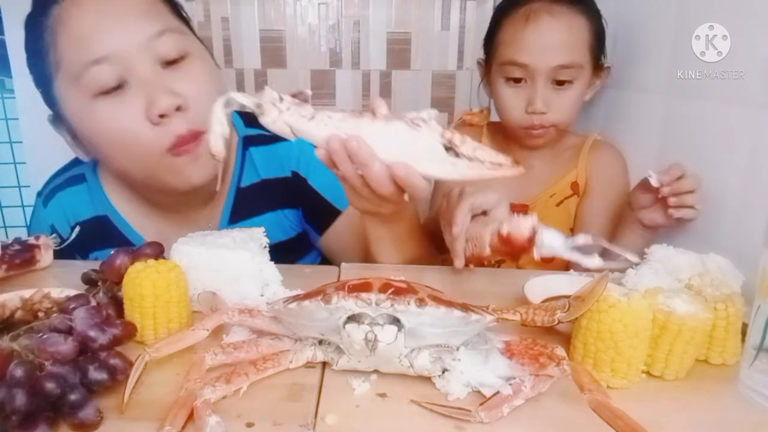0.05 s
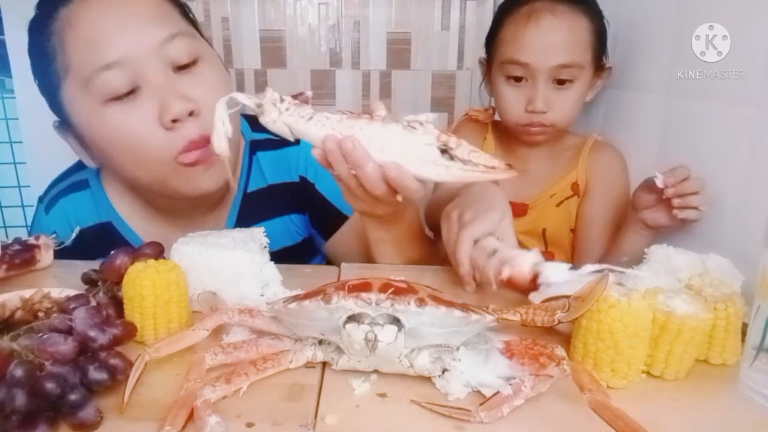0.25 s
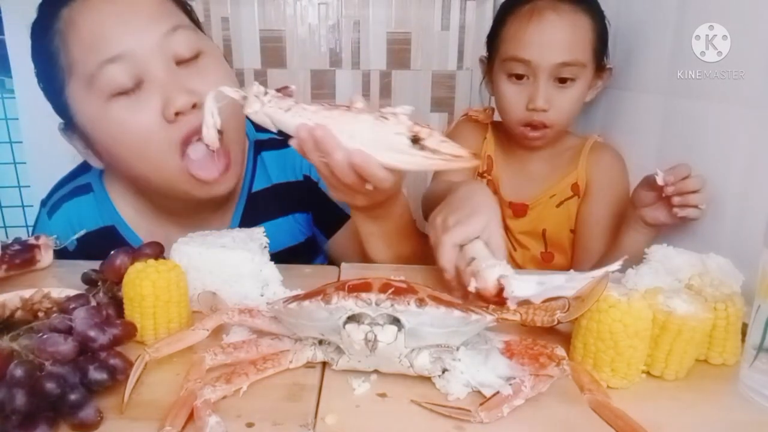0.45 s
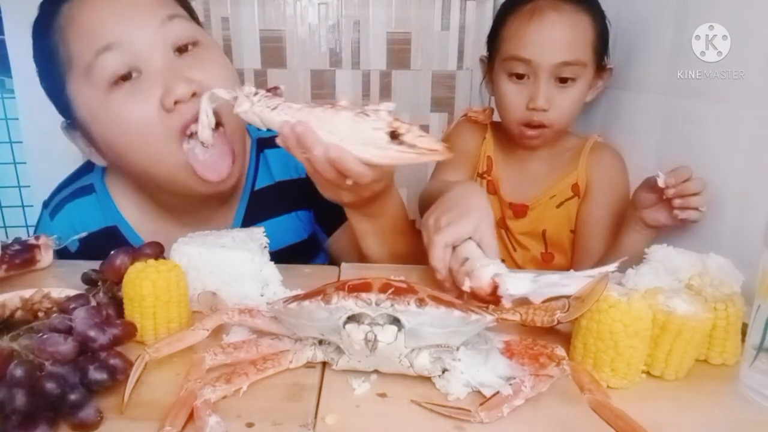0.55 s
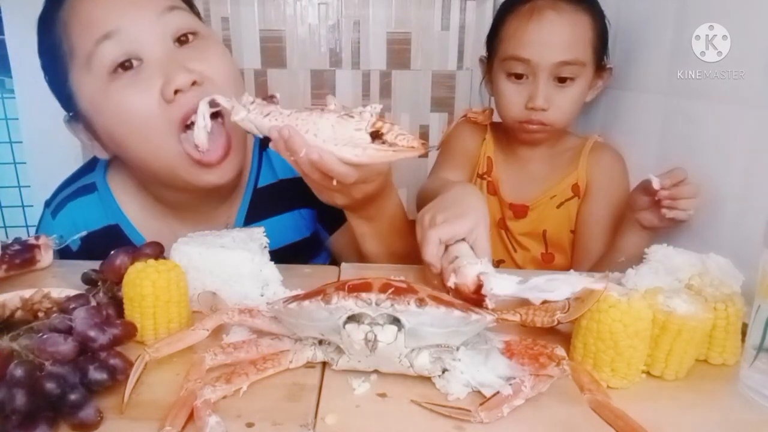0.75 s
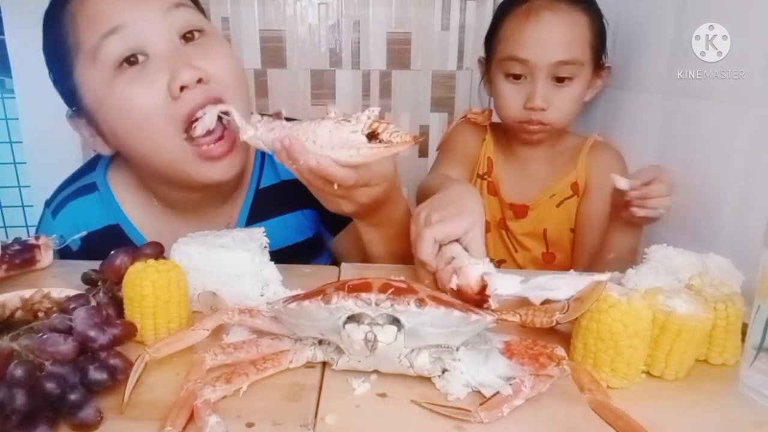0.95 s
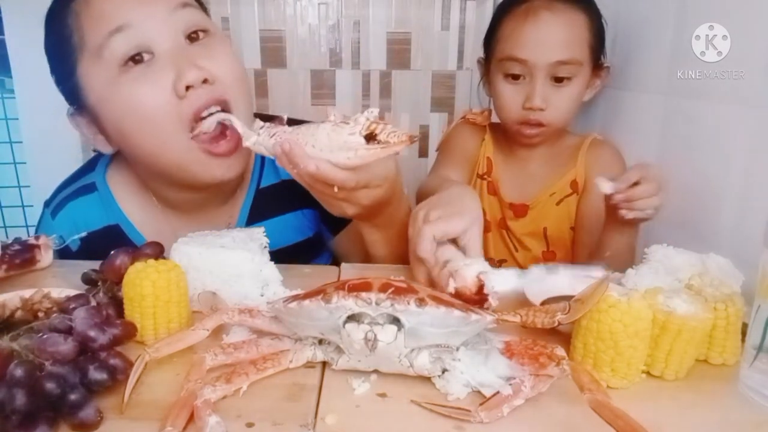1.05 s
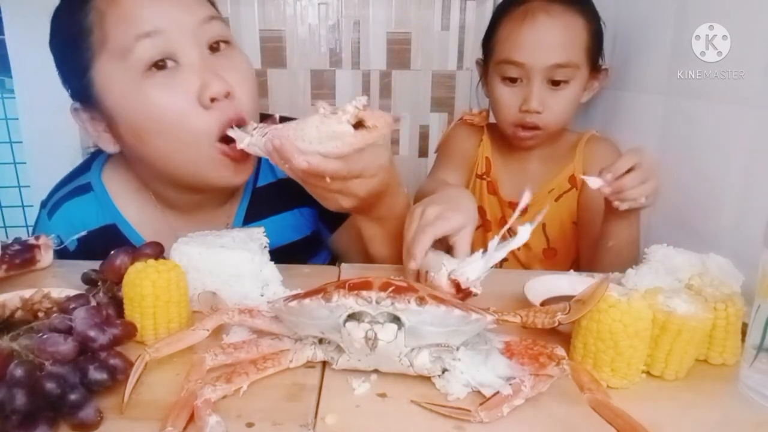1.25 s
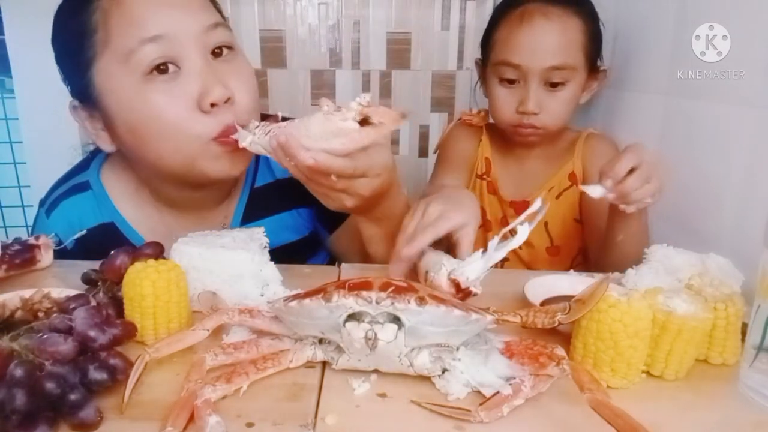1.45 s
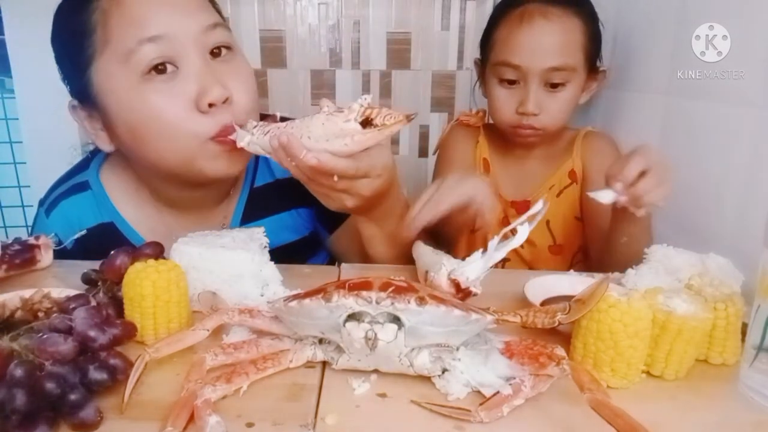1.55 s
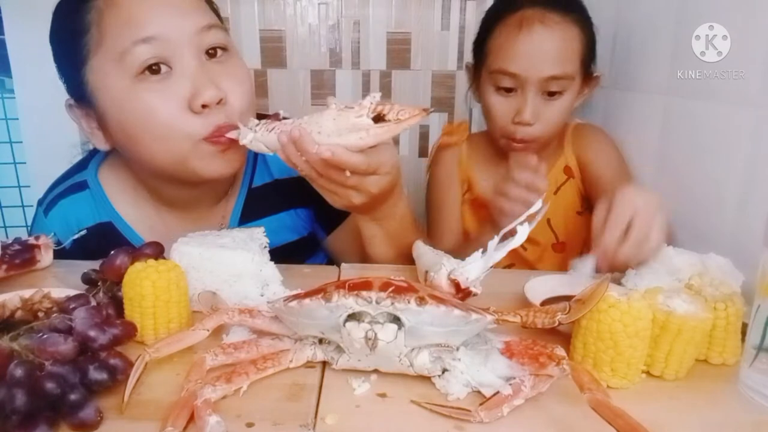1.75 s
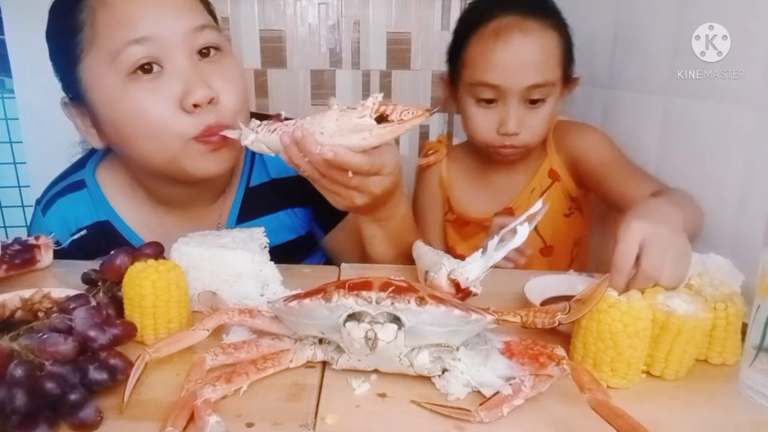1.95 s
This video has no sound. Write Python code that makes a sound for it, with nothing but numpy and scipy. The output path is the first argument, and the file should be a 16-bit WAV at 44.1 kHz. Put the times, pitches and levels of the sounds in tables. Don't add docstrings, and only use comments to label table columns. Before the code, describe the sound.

One loud clack of shell on wood comes early, then tiny crackles, a cluster of duller taps and thuds around the middle, and faint scraping; close phone pickup, short room echo, quiet insect rasp and low rumble behind.

```python
import sys
import numpy as np
from scipy import signal
from scipy.fft import rfft, irfft, next_fast_len
from scipy.io import wavfile
from scipy.ndimage import uniform_filter1d, map_coordinates

SR = 44100
rng = np.random.default_rng(int(sys.argv[2]) if len(sys.argv) > 2 else 0)


def undo_db(level):
    steps = np.asarray(level, float) / 20
    return 10 ** steps


def unload_wav(signal):
    wavfile.write(
        sys.argv[1],
        SR,
        np.round(np.clip(np.atleast_2d(signal).T, -1, 1) * 32767).astype(np.int16),
    )


N = 88200
T = np.arange(SR // 2) / SR

# start in seconds, peak level in dB.
KNOCKS = [
    (.2305, -9),
    (.2345, -16),
    (.2395, -20),
]
TABLE_HZ = [275, 468, 545, 715, 915, 980, 1115, 1281, 1670, 1733, 2070, 2900]
# level in dB, time to fall 60 dB in seconds.
TABLE_RING = [(-14, 0.19), (-7.5, 0.077), (-6, 0.075), (4.5, 0.077), (4, 0.18), (5.5, 0.064), (5, 0.09),
              (-6, 0.045), (11.5, 0.05), (-10, 0.086), (-4, 0.013), (3, 0.043)]
DISH_HZ = [2388, 2375, 4897, 4906, 7515, 7998, 11826]
# level in dB, time to fall 60 dB in seconds.
DISH_RING = [(-14.5, .21), (-15, .23), (-32, .22), (-42, .34), (-36, .1), (-29, .09), (-42, .13)]
DISH_BEAT_S = [.021, .021, .105, .105, 0, 0, 0]
# frequency in Hz, level in dB per Hz.
SPLASH_COLOUR = [(59, -54.5), (100, -25.5), (942, -15), (1430, -8), (1700, -16), (4640, -27), (4940, -23.5),
                 (8170, -42.5), (15000, -77.5)]
# frequency in Hz, time to fall 60 dB in seconds.
SPLASH_FADE = [(150, 0.32), (700, 0.19), (1600, 0.19), (3000, 0.26), (5000, 0.1), (9000, 0.11), (15000, .1)]

THUD_S = [.222, .665, .69, .77, 1.063, 1.078, 1.197, 1.216, 1.24, 1.2245, 1.253, 1.0675]
# peak level in dB, time to fall 60 dB in seconds, corner above which it is dull in Hz.
THUDS = [(-42.5, .05, 850), (-49, 0.19, 290), (-40, 0.071, 186), (-56.5, 0.16, 430), (-23.5, 0.067, 1700),
         (-15.5, 0.014, 5000), (-36, 0.048, 770), (-31.5, 0.097, 260), (-39.5, 0.083, 330), (-56, .06, 160),
         (-35, 0.046, 120), (-24.5, 0.01, 1800)]
# frequency in Hz, level in dB.
THUD_NOTES = [(85, -8.5), (228, 6.5), (330, -6.5), (565, -4), (713, -3.5), (915, -6), (1350, -12.5)]

TICK_S = [.2015, .4277, .477, .6888, .689, .6893, .6896, .922, .9874, 1.0054, 1.006, 1.015, 1.094, 1.3115,
          1.312, 1.3142, .9878, .989, 1.006, 1.012, 1.014, 1.023, 1.1185, .4821, .482, .474, .4905, .498,
          .474, .435, 1.016, 1.3125, 1.316, .2305, .2305, .2345, .231, .692, 1.124, 1.2158, 1.1965, 1.0645,
          1.079, 1.0058, .9878]
TICK_HZ = [4300, 3700, 2850, 1300, 13000, 8600, 4400, 2800, 4700, 5400, 11500, 5500, 3800, 6600, 4200, 6500,
           5430, 3080, 3870, 3080, 4550, 5600, 2850, 2850, 1150, 5300, 3700, 1550, 3700, 3300, 7300, 7100,
           4000, 3000, 4300, 5500, 14500, 1650, 3700, 236, 240, 715, 600, 9000, 12500]
# peak level in dB, time to fall 60 dB in seconds.
TICKS = [(-61.5, .02), (-49.5, 0.033), (-51, 0.03), (-55.5, 0.081), (-53.5, 0.0069), (-39, 0.015),
         (-34.5, 0.013), (-68.5, 0.11), (-51, 0.017), (-43, 0.049), (-44, 0.0082), (-44, 0.023),
         (-52, 0.054), (-41, 0.016), (-56.5, 0.063), (-37, 0.083), (-54, 0.053), (-65, .03), (-55.5, 0.078),
         (-60, 0.05), (-66, 0.023), (-45, 0.017), (-59.5, 0.12), (-52, 0.042), (-47.5, 0.0091),
         (-54, 0.035), (-54, 0.022), (-52.5, 0.014), (-60, 0.015), (-50.5, 0.014), (-46.5, .02),
         (-37.5, 0.044), (-63, 0.044), (-22, 0.015), (-30.5, .01), (-29, .012), (-50.5, .01), (-62, 0.062),
         (-54, 0.024), (-45, 0.099), (-49.5, 0.07), (-44, 0.081), (-40, 0.03), (-50, .005), (-56, .005)]

RUB_S = [.40, .465, .652, .688, .69, .90, .972, .985, 1.0, 1.055, 1.09, 1.095, 1.19, 1.2, 1.24, 1.3, 1.44,
         1.47, 1.53, 1.55, 1.75, 1.93, 1.063, .68, 1.42, 0, 0, 1.3, 1.325, 1.79, 1.213, 1.313, .41, .475,
         .39]
RUB_HZ = [3300, 1700, 3200, 13500, 4500, 1250, 13000, 4500, 3300, 15000, 3300, 1200, 700, 1450, 14500, 1450,
          620, 1400, 3300, 1450, 1630, 610, 750, 450, 950, 830, 300, 810, 1330, 68, 245, 4000, 200, 2500,
          1500]
# length in seconds,
# level in dB, width in Hz.
RUBS = [(0.047, -63, 3200), (0.021, -51.5, 1700), (0.073, -63.5, 820), (0.035, -67.5, 5000),
        (0.063, -89, 4200), (0.36, -68, 270), (0.11, -78, 3800), (0.027, -62.5, 920), (0.066, -62.5, 3500),
        (0.032, -74, 1500), (0.072, -61.5, 1200), (0.064, -55.5, 420), (0.096, -64, 380), (0.098, -66, 28),
        (0.044, -77.5, 4300), (0.1, -67, 260), (0.2, -72, 130), (0.19, -65, 190), (0.038, -70.5, 34),
        (0.13, -64, 250), (0.047, -62.5, 23), (0.049, -64, 17), (.04, -45.5, 245), (0.12, -70, 130),
        (0.25, -78, 357), (0.041, -74.5, 150), (0.062, -71, 250), (.07, -73, 65), (0.02, -58.5, 39),
        (.22, -60, 32.8), (0.052, -55, 64), (0.028, -63, 440), (.2, -68.5, 93), (0.039, -64.5, 620),
        (.09, -63, 670)]

# frequency in Hz, time to fall 60 dB in seconds.
ROOM_FADE = [(200, 0.14), (1500, 0.31), (5000, 0.18), (12000, 0.13)]

# centre in Hz, width in Hz, level in dB, chirps per second, chirp depth in dB.
CHORUSES = [
    (5270, 380, -73, 3, 0),
    (5340, 80, -72.5, 8.1, 5),
    (6904, 150, -66, 10.5, 4.5),
    (7110, 520, -67.5, 4.7, 5),
    (9960, 730, -62.5, 9, 0),
]
# time in seconds, level in dB.
LOW_CHORUS_NEARNESS = [(0, -9), (.2, -4), (.4, 4.5), (.5, -5), (.56, -12), (.72, 7), (.82, -9.5), (.88, -1),
                       (1.2, 3), (1.4, 4.5), (1.46, -11), (1.56, 4), (1.72, -4.5), (1.85, -3.5), (2, 1.5)]
# time in seconds, pitch in Hz.
LEAD_SINGER = [(0.0, 5520), (0.22, 4960), (0.37, 5480), (0.49, 5150), (0.67, 5650), (0.81, 5243),
               (0.85, 5460), (1.02, 5490), (1.14, 5200), (1.2, 5543), (1.6, 5283), (1.67, 5590),
               (1.75, 5250), (2.0, 5490)]

# frequency in Hz, level in dB per Hz.
HISS_COLOUR = [(40, -38.5), (200, -1.5), (1600, -10.5), (4400, -18), (6200, -8.5), (8600, 1.5),
               (10900, -11.5), (11500, -29)]
# frequency in Hz, level in dB per Hz.
RUMBLE_COLOUR = [(20, -42.5), (45, -14), (70, -3.5), (114, -7.5), (211, -17), (400, -36), (1100, -120)]
# time in seconds, level in dB.
RUMBLE_LEVEL = [(0.0, -88), (0.26, -57.5), (0.49, -83), (0.73, -67), (0.99, -63.5), (1.09, -56.5),
                (1.15, -53), (1.25, -72), (1.32, -62.5), (1.98, -68.5), (2.0, -67)]
# time in seconds, pitch in Hz, level in dB.
HUM = [(0.4, 115.4, -79), (1.054, 117.7, -55.5), (1.064, 115.8, -45), (1.312, 115.3, -61.5),
       (1.526, 116.2, -54), (1.732, 114.9, -81), (1.794, 109.8, -68.5), (2.0, 114.7, -62)]


def unit(x):
    return x / np.sqrt(np.mean(x ** 2) + 1e-20)


def along(points, hz):
    point_hz, values = np.transpose(points)
    return np.interp(np.log(hz + 1), np.log(point_hz + 1), values)


def curves(rows):
    seconds, *columns = np.transpose(rows)
    return [np.interp(np.arange(N) / SR, seconds, column) for column in columns]


def wobble(rate):
    return map_coordinates(rng.standard_normal(200), [np.arange(N) * rate / SR])


def filtered(x, response):
    size = next_fast_len(len(x) + SR // 2)
    spectrum = rfft(x, size) * response(np.fft.rfftfreq(size, 1 / SR))
    return irfft(spectrum, size)[:len(x)]


def resonance(hz, width_hz):
    return lambda f: (1j * f * width_hz / (hz * hz - f * f + 1j * f * width_hz)) ** 2


def band(hz, width_hz):
    return lambda f: np.exp(-np.abs((f - hz) / width_hz) ** 3)


def dying_noise(fade, colour=((1, 0),)):
    hz, t, z = signal.stft(rng.standard_normal(SR // 2), SR, nperseg=256)
    level_db = along(colour, hz)[:, None] - 60 * t / along(fade, hz)[:, None]
    tail = signal.istft(z * undo_db(level_db), SR, nperseg=256)[1]
    return tail / np.linalg.norm(tail)


def add(out, s, x):
    i = round(s * SR)
    out[i:i + len(x)] += x[:len(out) - i]


def in_room(x, wet_db):
    echoes = signal.fftconvolve(np.pad(x, (130, 0)), dying_noise(ROOM_FADE))
    return np.pad(x, (0, SR // 2)) + undo_db(wet_db) * echoes[:len(x) + SR // 2]


def table_knocks():
    out = np.zeros(N)
    for s, db in KNOCKS:
        wood = np.zeros(len(T))
        for hz, (note_db, t60) in zip(TABLE_HZ, TABLE_RING):
            wood += undo_db(note_db + rng.normal(0, 2.5) - 60 * T / t60) * np.sin(2 * np.pi * hz * T)
        wood *= 1 - np.exp(-T / 0.00055)
        add(out, s, undo_db(db - 14.5) * in_room(wood, -11))
    return out


def dish():
    out, ring = np.zeros(N), np.zeros(len(T))
    for k, (hz, beat_s, (note_db, t60)) in enumerate(zip(DISH_HZ, DISH_BEAT_S, DISH_RING)):
        ring += (-1) ** k * undo_db(note_db - 60 * T / t60) * np.sin(2 * np.pi * hz * (T - beat_s))
    add(out, KNOCKS[0][0], undo_db(-4.5) * ring * (1 - np.exp(-T / .008)))
    return out


def wood_splash():
    def modes(f):
        between_db, width_hz = -9, 50
        return undo_db(between_db) + sum(np.abs(resonance(hz, width_hz)(f)) for hz in TABLE_HZ)

    out = np.zeros(N)
    noise = filtered(dying_noise(SPLASH_FADE, SPLASH_COLOUR)[:len(T)], modes)
    add(out, KNOCKS[0][0], undo_db(-20.5 + 32.5) * noise * (1 - np.exp(-T / 0.00018)))
    return out


def thuds():
    out = np.zeros(N)
    for s, (db, t60, dull_hz) in zip(THUD_S, THUDS):
        ring = np.zeros(len(T))
        for hz, note_db in THUD_NOTES:
            fade = undo_db(note_db + rng.normal(0, 1.5) - 60 * T / t60)
            pitch = hz * (1 + 0.044 * rng.normal())
            ring += fade / (1 + (hz / dull_hz) ** 2) * np.sin(2 * np.pi * pitch * T)
        ring *= (1 - np.exp(-T / 0.0016)) ** 2
        add(out, s, undo_db(db - 4.5) * in_room(ring, -8))
    return out


def ticks():
    out, t = np.zeros(N), T[:4000]
    for s, hz, (db, t60) in zip(TICK_S, TICK_HZ, TICKS):
        notes_hz = hz * (1 + .025 * rng.standard_normal(5))
        ring = np.sin(2 * np.pi * np.outer(notes_hz, t)).sum(0)
        ring *= undo_db(-60 * t / t60) * (1 - np.exp(-t / 0.00056))
        add(out, s, undo_db(db - 8.0) * in_room(ring, -7.5))
    return out


def rubs():
    slips_per_s, slip_db, shell_db, rise = 3000, 2.5, 7, .15
    out = np.zeros(N)
    for s, hz, (length, db, width_hz) in zip(RUB_S, RUB_HZ, RUBS):
        chance, size, side = rng.random((3, SR // 2))
        bumps = rng.standard_normal(150)
        slips = (chance < slips_per_s / SR) * undo_db(-slip_db * np.log(size)) * np.sign(side - .5)

        def shell(f):
            return resonance(hz, width_hz)(f) * undo_db(shell_db * np.interp(f, np.arange(150) * 150, bumps))

        u = T / length
        stroke = np.clip(u / rise, 0, 1) * np.clip((1.2 - u) / (1.2 - rise), 0, 1)
        add(out, s, undo_db(db) * in_room(stroke * unit(filtered(slips, shell)), -7.5))
    return out


def insects():
    clicks_per_s, click_db = 38, -2
    t, voices = np.arange(N) / SR, []
    for hz, width_hz, db, chirps_per_s, depth_db in CHORUSES:
        throb_db = click_db * np.sin(2 * np.pi * clicks_per_s * t + 0.68 * wobble(26))
        swell_db = depth_db * np.sin(2 * np.pi * chirps_per_s * t + 0.29 * wobble(7.1))
        swell_db += 0.29 * wobble(4.7)
        rasp = undo_db(throb_db) * rng.standard_normal(N)
        voices.append(undo_db(db + swell_db) * unit(filtered(rasp, band(hz, width_hz))))
    lead_hz, = curves(LEAD_SINGER)
    drift = 2 * np.pi * np.cumsum(lead_hz - CHORUSES[1][0]) / SR
    lead = np.real(signal.hilbert(voices[1]) * np.exp(1j * drift))
    near_db, = curves(LOW_CHORUS_NEARNESS)
    return undo_db(near_db) * (voices[0] + lead) + sum(voices[2:])


def hiss():
    z = signal.stft(rng.standard_normal(N), nperseg=512)[2]
    patches = uniform_filter1d(uniform_filter1d(rng.standard_normal(z.shape), 5, 0), 9, 1)
    patchy = signal.istft(z * undo_db(4.5 * unit(patches)), nperseg=512)[1][:N]
    return undo_db(-70.5) * unit(filtered(patchy, lambda f: undo_db(along(HISS_COLOUR, f))))


def rumble():
    level_db, = curves(RUMBLE_LEVEL)
    lumps = undo_db(level_db + 1.5 + 7.1 * wobble(8))
    return lumps * unit(filtered(rng.standard_normal(N), lambda f: undo_db(along(RUMBLE_COLOUR, f))))


def fan_hum():
    hz, level_db = curves(HUM)
    level = undo_db(level_db + 0.5 + 2.5 * wobble(9.2))
    return level * np.sin(2 * np.pi * np.cumsum(hz + 1.0 * wobble(15)) / SR)


def scene():
    contacts = table_knocks() + dish() + wood_splash() + thuds() + ticks() + rubs()
    background = insects() + hiss() + rumble() + fan_hum()
    return (contacts + background)[None]


def band_limit(x):
    return signal.sosfilt(signal.butter(12, 15590, fs=SR, output="sos"), x)


def record(dry):
    mix = filtered(dry[0], lambda f: f < 15650)[None]
    return band_limit(mix)


dry = scene()
out = record(dry)
unload_wav(out)
```